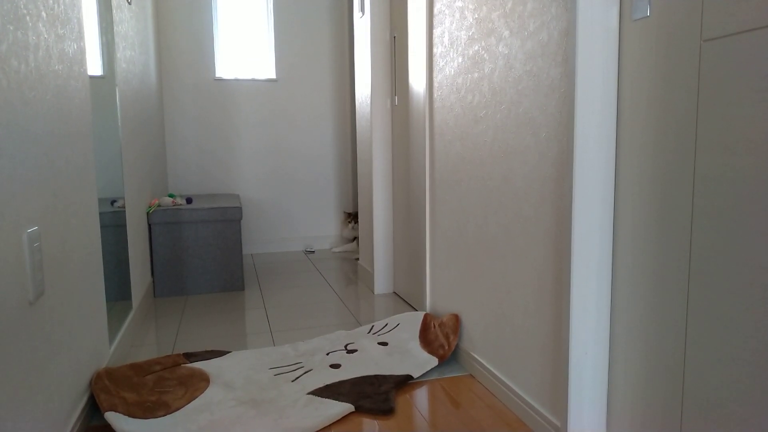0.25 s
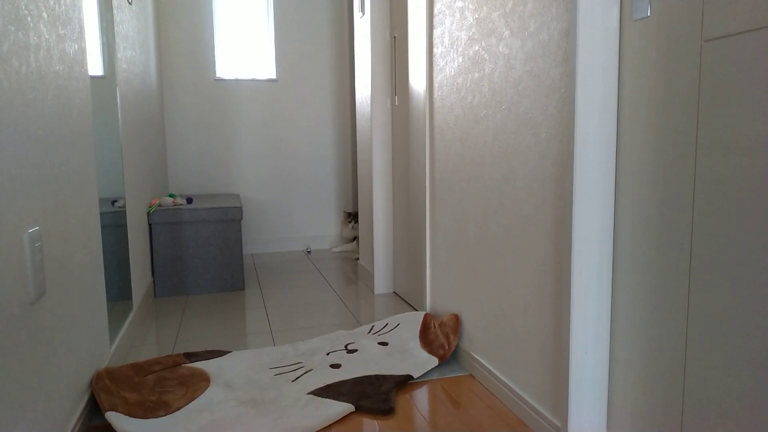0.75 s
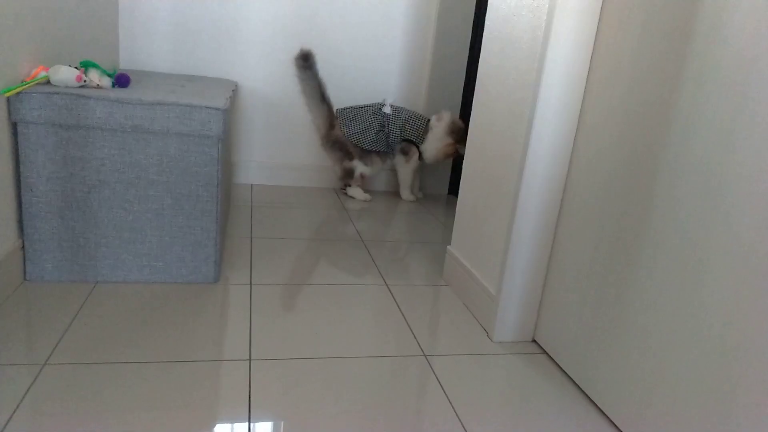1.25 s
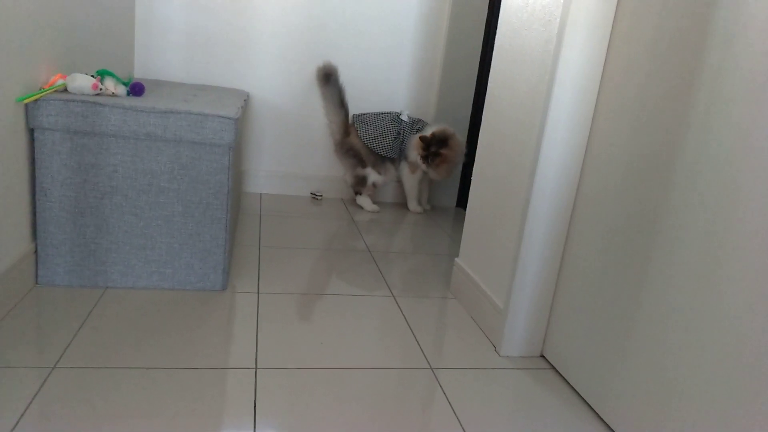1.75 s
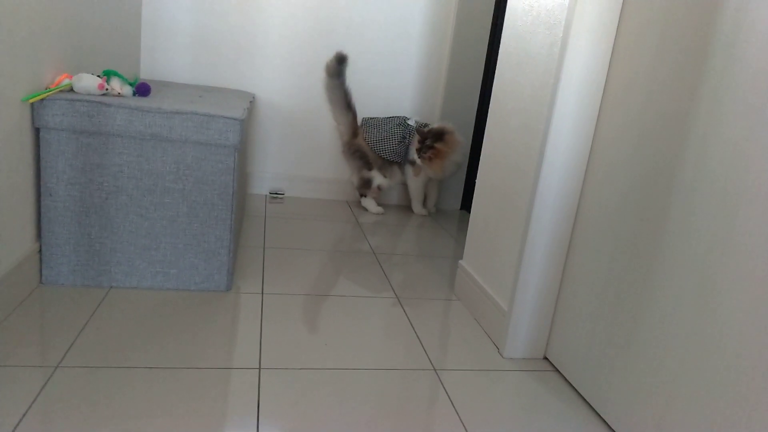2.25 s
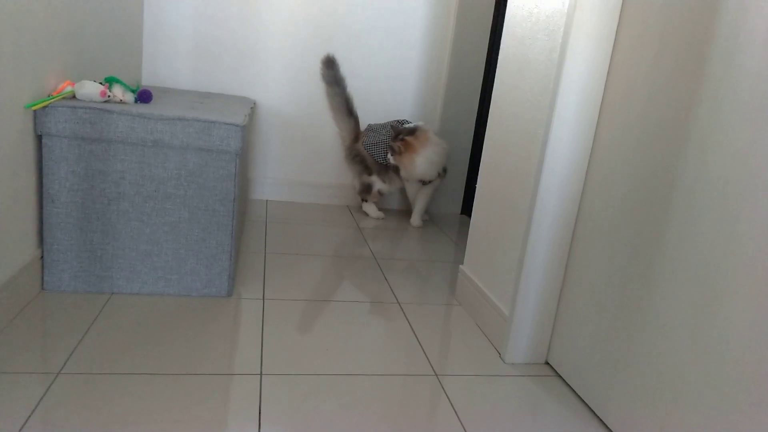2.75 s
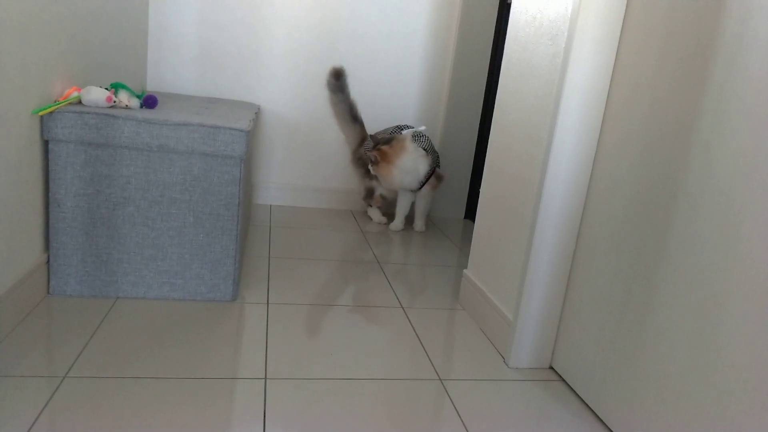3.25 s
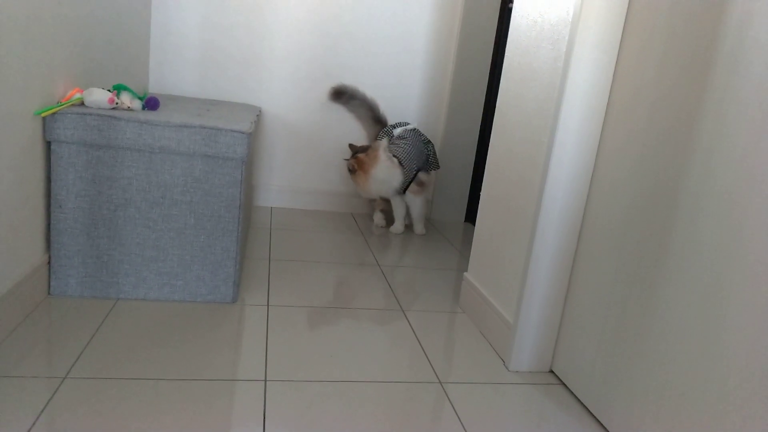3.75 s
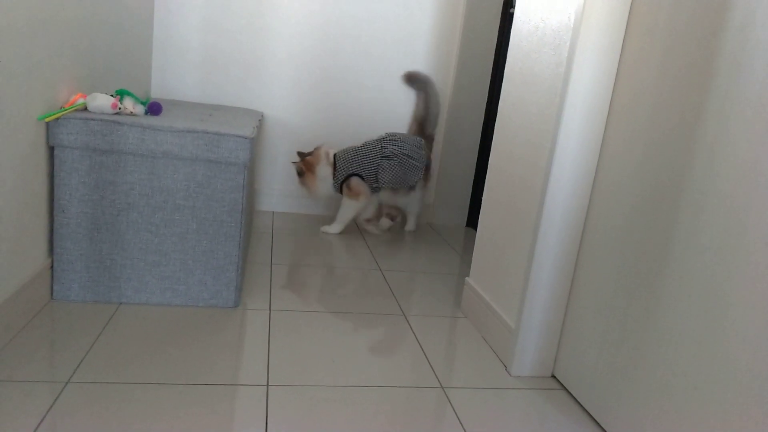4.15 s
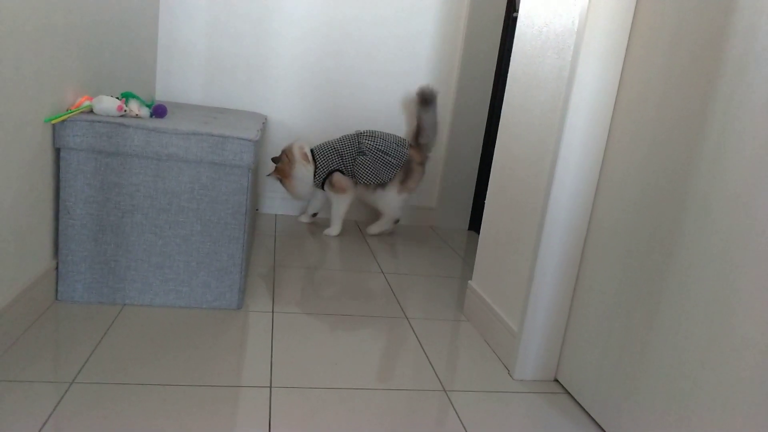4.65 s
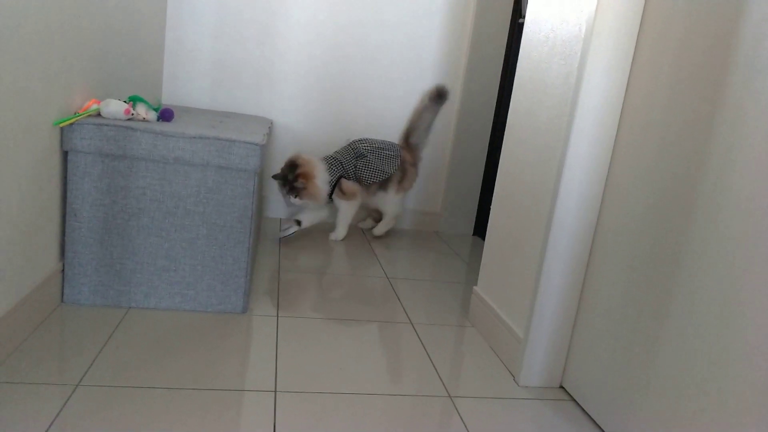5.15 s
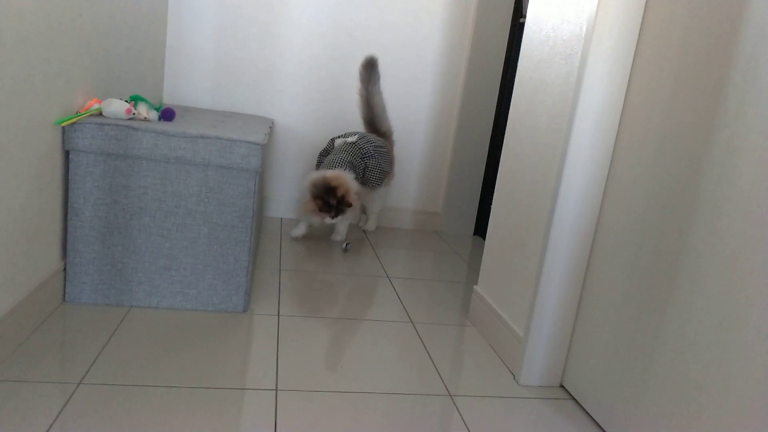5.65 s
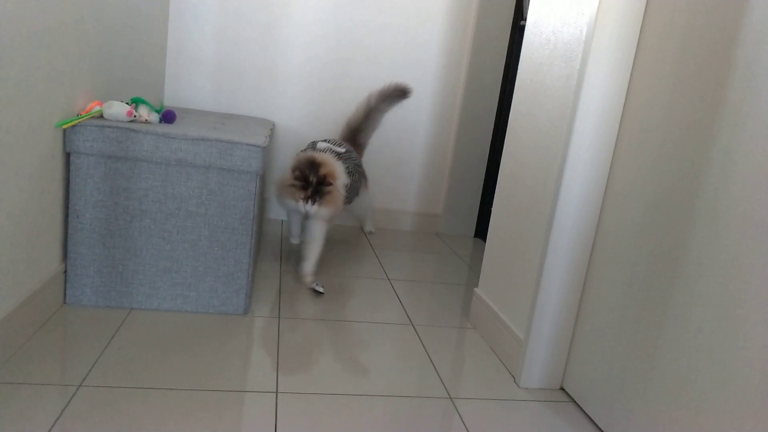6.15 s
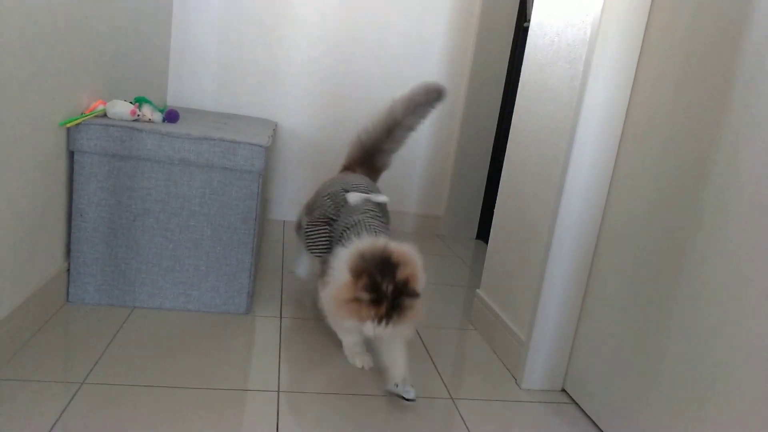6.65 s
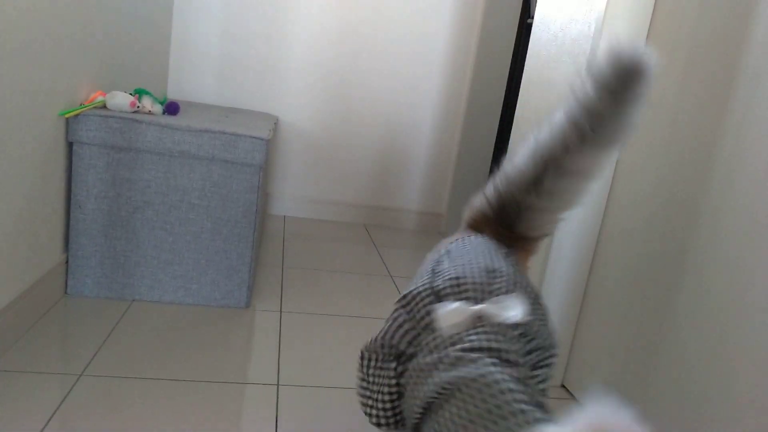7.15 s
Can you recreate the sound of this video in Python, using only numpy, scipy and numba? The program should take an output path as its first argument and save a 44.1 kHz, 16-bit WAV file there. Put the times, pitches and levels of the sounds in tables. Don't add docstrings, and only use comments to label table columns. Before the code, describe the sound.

In a bare tiled hallway, a small battery toy whirs and clacks rapidly in a steady run. The sound cuts abruptly to a farther, quieter stretch of stop-start knocks and faint gear whines with pauses. Then a cat bats the toy nearer: it skids, squeaks, rattles and jingles, ending in loud, bright plastic snaps right by the phone microphone, over a low house hum.

```python
import sys
import numpy as np
from scipy import signal
from scipy.fft import rfft, irfft
from scipy.io import wavfile
from scipy.ndimage import uniform_filter1d
from numba import njit

SR = 44100
rng = np.random.default_rng(int(sys.argv[2]) if len(sys.argv) > 2 else 0)


def store_wav(level_fs):
    pcm = np.round(np.clip(np.atleast_2d(level_fs), -1, 1) * 32767)
    wavfile.write(sys.argv[1], SR, pcm.T.astype(np.int16))


def voltage_ratio(decibels):
    exponent = np.asarray(decibels, float) / 20
    return 10 ** exponent


N = 325891
TIME = np.arange(N) / SR
HZ = np.fft.rfftfreq(N, 1 / SR) + 1e-3

STARTS_S = [
    0,
    1.54,
    5.45,
    6.88,
    7.4,
]
CHANGE_S = 1.288

# (time [s], clack level [dB], tick against clack [dB], struck note [Hz])
STEADY_KNOCKS = [(0.0054, -37.5, 6, 730), (0.0363, -46.5, 14.5, 576), (0.0909, -37, 6.5, 574),
                 (0.1765, -39, 5, 566), (0.2249, -39, 5, 580), (0.2561, -49, 10, 573),
                 (0.2914, -38.5, 6, 620), (0.3563, -40.5, 9, 1120), (0.4507, -36.5, 7.5, 1130),
                 (0.505, -42, 9, 573), (0.5341, -38, 6, 1130), (0.5831, -42.5, 9.5, 720),
                 (0.6156, -44, 10, 1590), (0.6537, -40, 4, 891), (0.70, -39, 3.5, 563),
                 (0.7533, -42, 8, 991), (0.785, -42, 9, 580), (0.853, -38.5, 7.5, 710),
                 (0.868, -37.5, 8.5, 1130), (0.945, -41, 4.5, 575), (0.9881, -40, 5.5, 1090),
                 (1.054, -41.5, 9, 1860), (1.1129, -40.5, 8, 567), (1.196, -44, 6, 1000),
                 (1.2421, -37, 4, 4660)]
# (time [s], clack level [dB], shell against
# clack [dB], tick against clack [dB], struck note [Hz])
FAR_KNOCKS = [(1.5435, -36, 0, -8.5, 343), (1.7076, -58, -4, 3.5, 553), (1.7659, -46.5, 4.5, -9, 380),
              (1.7894, -51.5, -2, -22, 590), (1.934, -33, 1.5, -15, 1950), (2.9285, -40.5, 3.5, -10, 590),
              (2.9412, -32.5, -7, 0, 3030), (2.9491, -35.5, 0, -2, 690), (3.0571, -30.5, -1, -7, 1070),
              (3.1762, -36.5, -4, -16, 1160), (3.237, -41.5, 5, -4, 1110), (3.271, -37.5, -7, -9, 727),
              (3.3073, -39.5, 0.5, -10, 1190), (3.3154, -29, -11, -6, 710), (3.34, -36.5, -1, -8, 2490),
              (3.3603, -35.5, -4.5, -15, 760), (3.362, -36.5, -24, -8, 3880),
              (3.578, -34, -1.5, -11, 4184), (3.6511, -32, -5, -9, 624), (3.6726, -28, -1, -12.5, 1170),
                  (3.7694, -39, -3, -12.5, 770), (3.9482, -32, -4, -12.5, 990), (4.017, -38, -1.5, 0, 3080),
                  (4.089, -39, 2.5, -20, 1060), (4.136, -43, -3, -14, 2660), (4.2632, -46, 1, -8, 560),
                  (4.596, -52, 3, -11, 1280), (4.938, -51.5, 0, 6, 2100), (4.954, -44.5, -13, -6, 2150),
                  (4.9622, -35, -1, -10.5, 950), (5.019, -46, -11, 3, 1400), (5.1548, -58.5, -28, 10, 2000),
                  (5.172, -49.5, -26, 5, 2800), (5.183, -64, -22, 11.5, 2830)]
NEAR_KNOCKS = [(5.475, -33, -3, -3.5, 1550), (5.5457, -28.5, -12, 2, 3480), (5.644, -35, -16, 4, 1870),
               (5.665, -31, -13, 4.5, 1640), (5.7538, -35, -9.5, 3.5, 2820), (5.893, -44, -35, 0, 2780),
               (5.956, -28.5, -13.5, 0.5, 3100), (5.972, -24, -13, -0.5, 2300), (6.047, -36, -1.5, 7, 840),
               (6.0598, -30, -16, 4.5, 3120), (6.1118, -37.5, -1, 11, 1010), (6.1809, -32.5, -3.5, 3, 745),
               (6.2527, -33, -9.5, 2.5, 990), (6.334, -35.5, -1.5, 1.5, 2850),
               (6.3857, -27, -4.5, 2.5, 2580), (6.4714, -33, 0.5, -7, 2620), (6.48, -28.5, -14.5, 5.5, 850),
               (6.492, -36, -6, -11, 1330), (6.5456, -29, -6, 3, 1000), (6.5817, -34, -11, -11, 830),
               (6.6554, -34.5, -4, 5, 3680), (6.6719, -29, -16, 3, 2840), (6.808, -45, -31, 13, 2670)]
CLOSE_KNOCKS = [(6.8923, -29, -48, 3.5, 2540), (6.9056, -25.5, -30, 2.5, 4100),
                (6.9497, -28, -12.5, 6, 4500), (6.9785, -28.5, -15.5, 7, 4900),
                (7.042, -38.5, -33, 4, 2900), (7.0648, -35, -18, 7, 4220), (7.069, -25, -10.5, 3.5, 2730),
                (7.0983, -28, -9.5, 5, 2330), (7.1403, -24.5, -12, 5, 3400), (7.1449, -29, -25, 12.5, 4860),
                (7.251, -18.5, -9, -1.5, 2580), (7.256, -44, -11, -20, 2680), (7.2994, -33, -7, 11.5, 2660),
                (7.3403, -33, -9.5, 7, 3600), (7.344, -33, -8.5, 0, 3400),
                (7.3724, -18.5, -6.5, -2.5, 2430)]
# (shell from [Hz], clack from [Hz], tick from [Hz], top [Hz])
REGISTERS_HZ = [(280, 1350, 4800, 16600), (280, 1050, 4600, 13500), (420, 1300, 4800, 16600),
                (300, 1700, 4800, 16600)]
# (direct level [dB], tail level [dB], tail rise [s], ring level [dB], note level [dB])
SPACE = [(-17, -8.5, 0.0012, 17, -3), (-10.5, -5, 0.0048, 10, 2.5), (-6.5, -9.5, 0.0047, 0.5, -0.5),
         (-3.5, -13, 0.0037, 2.5, 2)]
# (shell T60 [s], clack T60 [s], tick T60 [s])
T60_S = [(0.99, 0.69, 0.25), (0.34, 0.33, 0.29), (0.52, 0.32, 0.27), (0.47, 0.34, 0.27)]
# (frequency [Hz], width [Hz], level [dB])
RESONANCES = [
    [(382.4, 4.8, -1), (576, 22, -5.5), (727, 63, -9.5), (927, 35, -10), (930, 7.3, -26), (1053, 3.8, -2),
     (1127, 2.5, -3), (1190, 7, -5.5), (1355, 10, -6), (1743, 30, -5.5), (3600, 290, -16)],
    [(340, 26, -2), (431.5, 25, 2.5), (530, 39, -4), (625, 7, 4), (710, 26, 5), (791, 11, 0.5),
     (910, 66, -1.5), (1170, 33, -3), (2000, 115, -6), (2744, 18, -1), (4420, 69, -12.5)],
    [(602, 9.7, 2), (650, 7.6, 8.5), (790, 7.2, 13.5), (850, 13, -17), (991, 5.4, 12.5), (1130, 23, 8.5),
     (2360, 3100, -0.5), (2770, 50, 5), (3740, 71, -21)],
    [(453, 75, 0.5), (2000, 340, 4.5), (2400, 140, -1), (2730, 250, 3), (3400, 100, 1), (3900, 190, 4.5),
     (4700, 120, -7)],
]
# (frequency [Hz], level [dB per Hz])
COLOUR = [(150, -29), (250, -6), (368, -5.5), (513, -5.5), (570, 0), (667, -5), (781, -1.5), (1470, -3),
          (2670, -4), (2960, -4.5), (5100, -1.5), (7900, -4.5), (9420, 1.5), (15100, -9.5), (16500, -100)]
TILT_DB = [0.74, -1.28, 0.02, -0.47]
PAN_DB = [0.82, 0.57, 0.49, -0.17]

# (start [s], length [s], shell level [dB])
LOADS = [
    [(0.0, 1.29, -48)],
    [(1.78, 0.028, -60), (2.2, 0.13, -70.5), (2.7, 0.16, -67), (3.22, 0.095, -48), (3.68, 0.18, -51.5),
     (4.17, 0.035, -58.5), (4.97, 0.045, -55.5)],
    [(5.6, 0.26, -59), (6.1, 0.21, -51), (6.5, 0.25, -55)],
    [(6.93, 0.2, -65), (7.19, 0.18, -63.5)],
]
PULL_S, COAST_S = 0.24, 0.072
# (coasting shell [dB], coasting hiss [dB], hiss against shell under load [dB])
IDLE = [(-62.5, -59.5, -7), (-66.5, -68, -17), (-78, -86, 3.5), (-75, -78, 8)]
# (frequency [Hz], level [dB])
MOTOR_TONES = [(398.4, -81), (575.0, -58.5), (732.1, -62), (979.8, -66), (1061, -65), (1114, -68),
               (1378, -69)]
# (start [s], length [s], level [dB])
FREE_RUNS = [(1.416, 0.015, -68), (2.05, .02, -67), (2.16, 0.022, -60.5), (2.476, 0.017, -65),
             (2.73, 0.066, -65.5), (4.3, 0.017, -61), (4.6, .01, -65.5), (4.85, 0.029, -62.5),
             (5.176, 0.076, -61), (5.76, 0.026, -59), (5.896, 0.038, -61), (6.334, 0.0093, -59),
             (6.71, 0.072, -56), (6.79, 0.043, -51)]
SPIN_UP_S, SPIN_DOWN_S = 0.042, 0.19
# (frequency [Hz], width [Hz], level [dB])
GEAR_MESH = [(1650, 32, 8), (2737, 98, 5.5), (2920, 54, -16), (3380, 81, 6), (3610, 73, 7.5)]

# (time [s], level [dB], note [Hz])
SKIDS = [
    [(5.5, -44, 1450), (5.558, -34.5, 1680), (5.648, -48, 1800), (5.716, -40.5, 2200), (5.77, -45, 2540),
     (5.94, -53, 2800)],
    [(5.97, -47, 1110), (6.036, -43, 910), (6.06, -38, 830), (6.11, -41, 895), (6.196, -42.5, 720),
     (6.226, -41, 640), (6.29, -42, 630), (6.372, -54, 800), (6.42, -50, 655), (6.45, -58, 800),
     (6.542, -61, 850), (6.588, -36.5, 850), (6.66, -46, 985), (6.76, -72, 625)],
    [(5.885, -60, 9100), (5.896, -35, 9200), (5.93, -45, 9000), (5.952, -53, 9200)],
]
# (time [s], peak level [dB])
SNAPS = [(0.007, -36), (0.3556, -33), (0.451, -32), (0.8535, -30), (1.1129, -36), (5.545, -26),
         (5.9748, -20), (6.0605, -28), (6.1118, -22), (6.2525, -27), (6.3865, -28), (6.478, -25),
         (6.548, -27), (6.675, -18), (6.8915, -22), (6.9077, -20), (6.9785, -22), (7.0985, -20),
         (7.2522, -5), (7.299, -18), (7.3725, -12)]
# (frequency [Hz], width [Hz], level [dB])
SNAP_RINGS = [(2650, 500, 6), (4200, 900, 2), (9400, 1500, 12)]
# (time [s], level [dB])
JINGLES = [(0.3556, -41.5), (0.378, -49), (0.4509, -42.5), (0.853, -47), (0.9877, -51), (1.1145, -57),
           (5.7538, -42), (5.886, -47), (5.896, -56), (6.0599, -32.5), (6.12, -38.5), (6.2271, -46),
           (6.263, -45), (6.49, -40), (6.673, -35), (6.892, -38), (7.145, -36.5), (7.2985, -31),
           (7.307, -42)]
# (time [s], peak level [dB])
TICKS = [(1.325, -48), (1.372, -49), (1.417, -53), (1.49, -53), (1.545, -44), (1.708, -48), (1.935, -45),
         (1.986, -48), (2.107, -50), (2.154, -50), (2.259, -53), (2.302, -51), (2.474, -51), (5.9736, -21),
         (6.061, -30), (6.1119, -21), (6.2535, -26.5), (6.4783, -25), (6.6726, -27), (6.9074, -29),
         (7.2517, -31), (7.2983, -18)]

# (frequency [Hz], level [dB per Hz])
HALL = [(12, -65), (20, -21), (79, -1), (124, -5), (184, -5.5), (281, -14.5), (404, -10.5), (599, -11.5),
        (729, -21), (1180, -24.5), (3520, -25), (4790, -82), (9670, -33), (15200, -30.5), (16500, -53)]
# (frequency [Hz], width [Hz], level [dB])
HUM = [(63, 32, 2), (103, 23, 0), (387, 3.6, 13)]
# (frequency [Hz], likeness [-1 to 1])
ALIKE = [(20, 0.92), (300, 0.81), (700, 0.6), (1300, -.2), (2600, 0.03), (16000, 0)]
# (frequency [Hz], left minus right [dB])
PORTS = [(60, 0.5), (110, 0), (200, 1), (380, 0), (700, -0.5), (1290, -1), (2380, -4.5), (4400, -3.5),
         (8120, 0.5), (15000, 1)]
# (frequency [Hz], width [Hz], level [dB])
INLET = [(9420, 450, 0)]
LAG = 6


def knocks(table, spell, gain):
    direct_db, tail_db, rise_s, _, note_db = SPACE[spell]
    edges = REGISTERS_HZ[spell]
    t = np.arange(SR // 2) / SR
    out = np.zeros((2, N + len(t)))
    for k, (lo, hi) in enumerate(zip(edges, edges[1:])):
        carrier = diffuse(gain * band(lo, hi))
        left, right = carrier
        straight = np.array([left, 0.062 * np.roll(left, LAG) + 1.21 * right])
        filling = 1 - np.exp(-t / (rise_s * np.sqrt(1350 / lo)))
        tail = voltage_ratio(tail_db - 60 * t / T60_S[spell][k]) * filling
        crack_db, crack_s = (-3, 0.5, 4)[k], (.06, .025, .012)[k]
        crack = voltage_ratio(direct_db + crack_db - 60 * t / crack_s)
        keep = signal.butter(2, lo * .8, "highpass", fs=SR, output="sos")
        for n, (s, db, shell_db, tick_db, note_hz) in enumerate(table):
            part = slice(n * 8000, n * 8000 + len(t))
            burst = signal.sosfilt(keep, carrier[:, part] * tail + straight[:, part] * crack)
            if k < 2 and lo <= note_hz < hi:
                b, a = signal.iirpeak(note_hz, (7.0, 9.0)[k], SR)
                burst = burst + voltage_ratio(note_db + 3.0) * signal.lfilter(b, a, burst)
            level = voltage_ratio(db + (shell_db, 0, tick_db)[k])
            out[:, int(s * SR):][:, :len(t)] += burst * level
    return out[:, :N]


def whir(spell, gain, split_hz):
    shell_db, hiss_db, load_db = IDLE[spell]
    load = swell(LOADS[spell], PULL_S, COAST_S)
    shell = diffuse(gain * band(246, split_hz), grit_db=2) * (voltage_ratio(shell_db) + load)
    shell = shell * voltage_ratio(-3.5 + 2.0 * walk(25))
    hiss = diffuse(gain * band(split_hz, 20000), grit_db=4) * (voltage_ratio(hiss_db) + voltage_ratio(load_db) * load)
    return shell + hiss * voltage_ratio(0.75 * walk(40))


def motor():
    tones = 0
    for hz, db in MOTOR_TONES:
        phase = 2 * np.pi * np.cumsum(hz * (1 + .003 * walk(9))) / SR
        tones = tones + np.sin(phase) * voltage_ratio(db + 1.5 * walk(14))
    return tones * voltage_ratio(np.where(TIME < CHANGE_S, 4.0, -12.0)) * (TIME < STARTS_S[1])


def whine():
    effort = swell(FREE_RUNS, SPIN_UP_S, SPIN_DOWN_S)
    mesh = diffuse(rings(GEAR_MESH, 11) * band(2140, 3500), grit_db=3.0)
    return mesh * effort * voltage_ratio(-0.5 + 2.0 * walk(29))


def skid(curve, width_hz, gain):
    s, db, hz = np.transpose(curve)
    note_hz = np.interp(TIME, s, hz)
    rub = np.array([svf(svf(x, note_hz, width_hz), note_hz, width_hz) for x in diffuse(gain)])
    level_db = np.interp(TIME, s, db, -120, -120)
    return rub / rub.std() * voltage_ratio(level_db - 4.0 + 2.0 * walk(30))


def snaps():
    hits = np.zeros(N)
    bounce = int(.0009 * SR)
    for s, db in SNAPS:
        hits[int(s * SR) + np.array([0, bounce])] += voltage_ratio(db) * np.array([1, -.6])
    click = irfft(rings(SNAP_RINGS, 0) * band(1800, 16000), N)[:SR // 200]
    mono = np.convolve(hits, click / click.max())[:N]
    return np.array([mono, np.roll(mono, LAG)])


def jingles():
    t = np.arange(SR // 5) / SR
    metal = band(8860, 15600) ** 2 * rings([(9200, 1300, 3.8)], 0)
    bright = diffuse(voltage_ratio(on_hz(COLOUR[:-1])) * metal, grit_db=-3)
    level = np.zeros((2, N + len(t)))
    for s, db in JINGLES:
        tail, strike = voltage_ratio(db - 60 * t / 0.2), voltage_ratio(db + 4.5 - 60 * t / 0.0095)
        level[:, int(s * SR):][:, :len(t)] += tail + strike
    return bright * level[:, :N]


def ticks():
    t = np.arange(SR // 50) / SR
    bright = diffuse(voltage_ratio(on_hz(COLOUR[:-1])) * band(9500, 14500))
    out = np.zeros((2, N))
    for s, db in TICKS:
        at = slice(int(s * SR), int(s * SR) + len(t))
        out[:, at] += bright[:, at] * voltage_ratio(db + 1.5 - 60 * t / 0.0073)
    return out


def hall():
    drone = diffuse(voltage_ratio(on_hz(HALL[:-1])) * rings(HUM, 0)) * voltage_ratio(-60.5)
    phase = 2 * np.pi * np.cumsum(90 + 2.37 * walk(7.3)) / SR
    return drone + np.sin(phase) * voltage_ratio(-63.5 + 2.0 * walk(6.1))


def on_hz(table):
    f, v = np.transpose(table)
    return np.interp(np.log(HZ), np.log(f), v)


def rings(table, lift_db):
    power = 1
    for f, width, db in table:
        power = power + voltage_ratio(lift_db + db) ** 2 / (1 + (2 * (HZ - f) / width) ** 2)
    return np.sqrt(power)


def band(lo, hi):
    return 1 / np.sqrt((1 + (lo / HZ) ** 12) * (1 + (HZ / hi) ** 12))


def diffuse(gain, grit_db=0):
    alike = np.clip(on_hz(ALIKE), -.9, 1)
    uneven = np.minimum(rng.exponential(size=N), 4)
    grains = rng.standard_normal((2, N)) * voltage_ratio(grit_db * uneven)
    mid, side = rfft(grains) * gain * np.sqrt([1 + alike, 1 - alike])
    x = irfft([mid + side, mid - side], N)
    return x / x.std()


def walk(rate):
    k = int(SR / rate)
    held = np.repeat(rng.standard_normal(N // k + 1), k)
    return 1.3 * uniform_filter1d(uniform_filter1d(held, k), k)[:N]


def swell(rows, rise_s, fall_s):
    gain = 0
    for s, length, db in rows:
        before = np.maximum(s - TIME, 0) / rise_s
        after = np.maximum(TIME - s - length, 0) / fall_s
        gain = gain + voltage_ratio(db - 34.0 * (before + after))
    return gain


@njit
def svf(x, hz, width):
    y, b, l = np.empty(len(x)), 0., 0.
    for i in range(len(x)):
        g, k = np.tan(np.pi * hz[i] / SR), width / hz[i]
        v = (b + g * (x[i] - l)) / (1 + g * (g + k))
        b, l, y[i] = 2 * v - b, l + 2 * g * v, k * v
    return y


def scene():
    out = hall() + ticks() + snaps() + jingles() + motor() + whine()
    out = out + skid(SKIDS[0], 1070.0, band(200, 6000))
    out = out + skid(SKIDS[1], 250.0, rings(RESONANCES[2], 16))
    out = out + skid(SKIDS[2], 1400.0, 1)
    joints = [(s, db, -8, tick_db, hz) for s, db, tick_db, hz in STEADY_KNOCKS]
    for spell, table in enumerate([joints, FAR_KNOCKS, NEAR_KNOCKS, CLOSE_KNOCKS]):
        colour_db = on_hz(COLOUR[:-1]) + TILT_DB[spell] * np.log2(HZ / 2000)
        gain = voltage_ratio(colour_db) * rings(RESONANCES[spell], SPACE[spell][3])
        running = (TIME >= STARTS_S[spell]) & (TIME < STARTS_S[spell + 1])
        heard = TIME < CHANGE_S if spell == 0 else 1
        coasting = (spell == 0) * (TIME > CHANGE_S)
        drive = whir(spell, gain, REGISTERS_HZ[spell][1]) * voltage_ratio(-7 * coasting)
        toy = heard * knocks(table, spell, gain) + running * drive
        out = out + toy * voltage_ratio(PAN_DB[spell] * np.array([[.5], [-.5]]))
    since = TIME - CHANGE_S
    fade_out = np.clip(-since / 0.026, 0, 1) ** 2
    fade_in = np.clip(since / .004, 0, 1) * voltage_ratio(-16 * np.clip(1 - (since / 0.092) ** 4, 0, 1))
    return out * np.where(since < 0, fade_out, fade_in)


def top_cut(x):
    return signal.sosfilt(signal.butter(12, 16660, fs=SR, output="sos"), x)


def record(dry):
    ports = voltage_ratio(np.outer([1, -1], on_hz(PORTS[1:])) / 2) * rings(INLET, 2)
    ports = ports * band(10, 16000) ** 2 * (HZ < 16700)
    mix = irfft(rfft(dry) * ports, N)
    return top_cut(mix)


dry = scene()
out = record(dry)
store_wav(out)
```